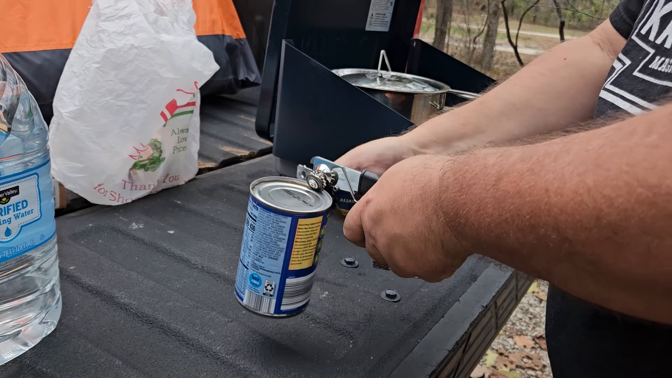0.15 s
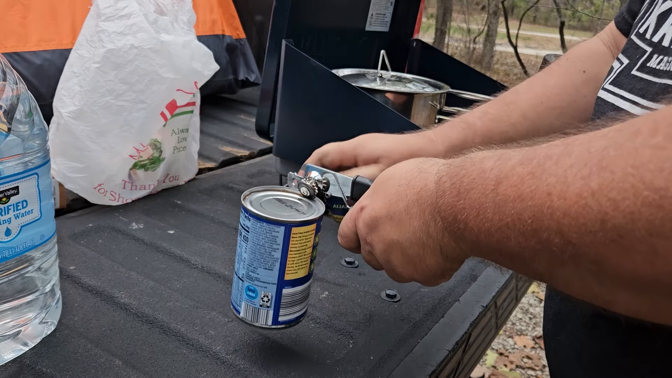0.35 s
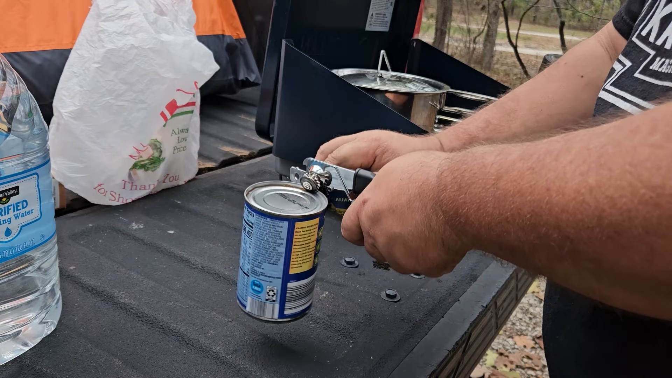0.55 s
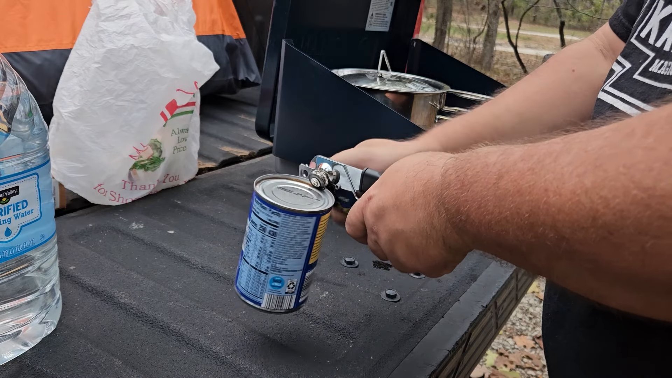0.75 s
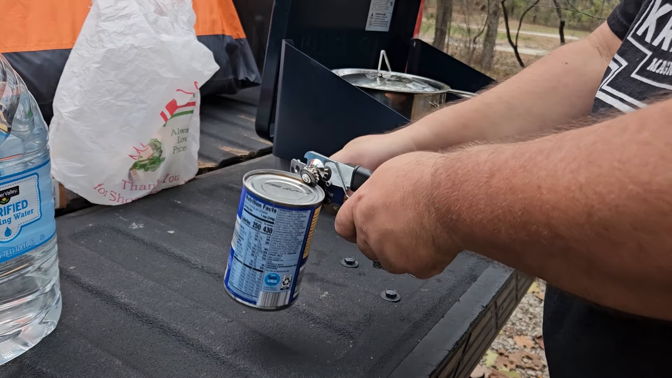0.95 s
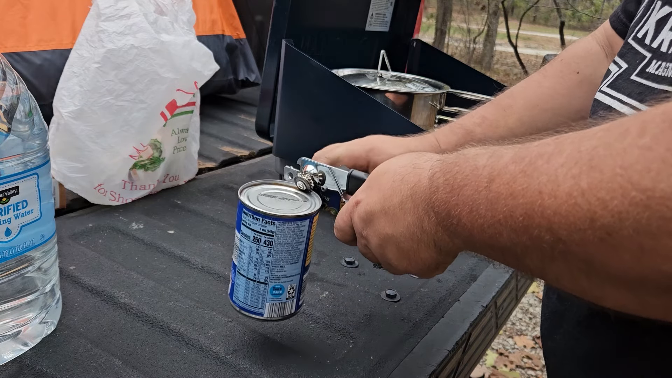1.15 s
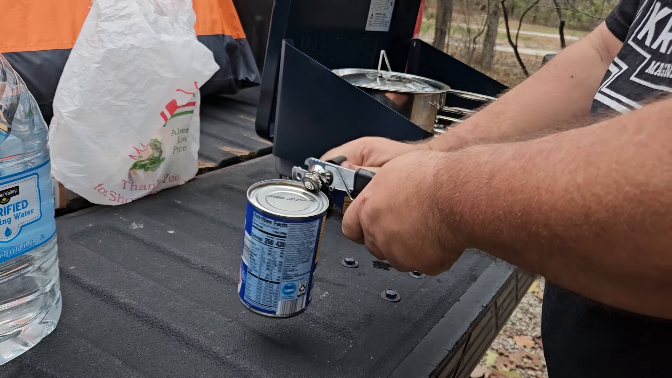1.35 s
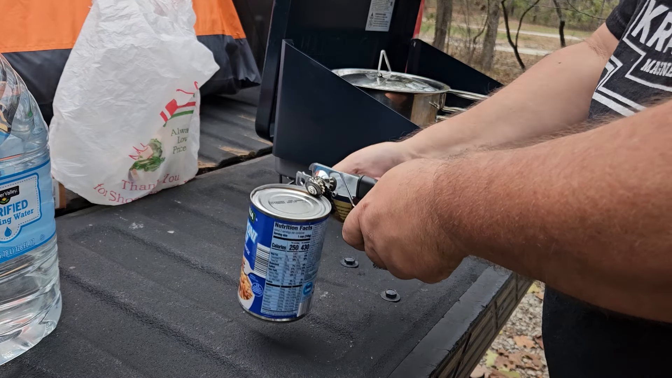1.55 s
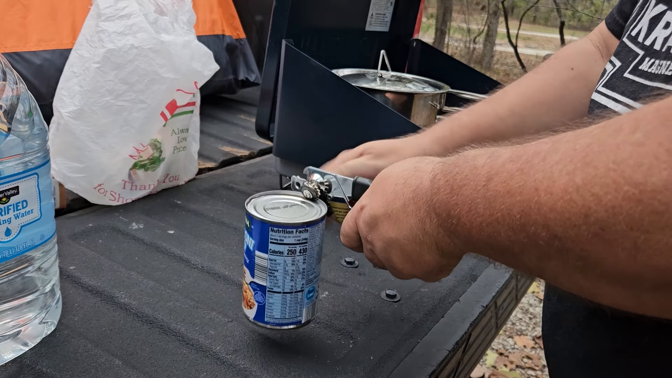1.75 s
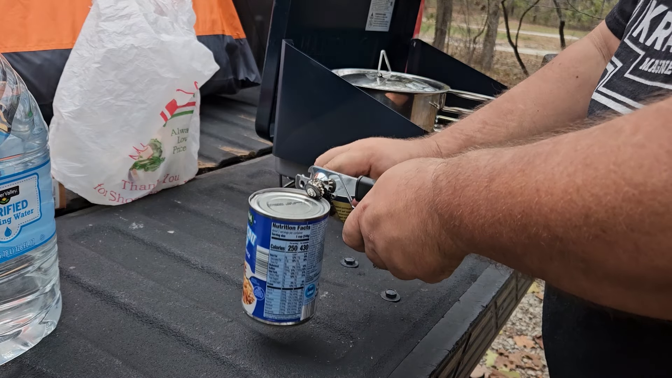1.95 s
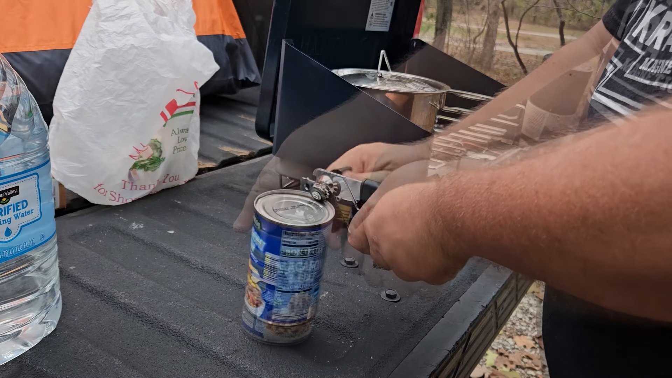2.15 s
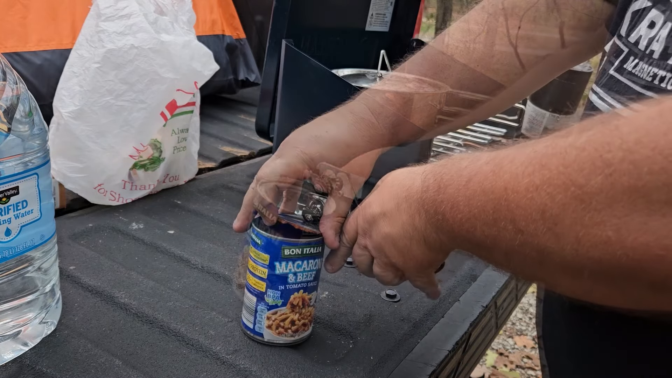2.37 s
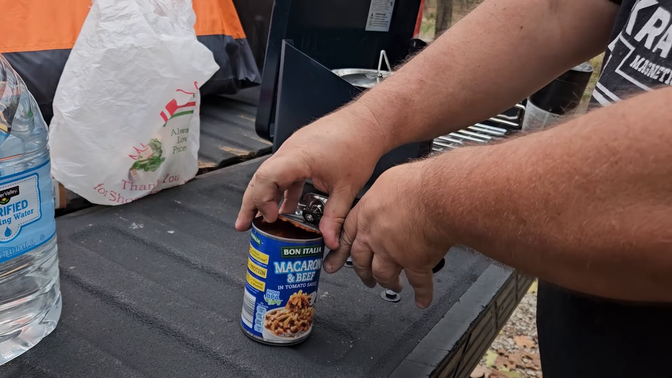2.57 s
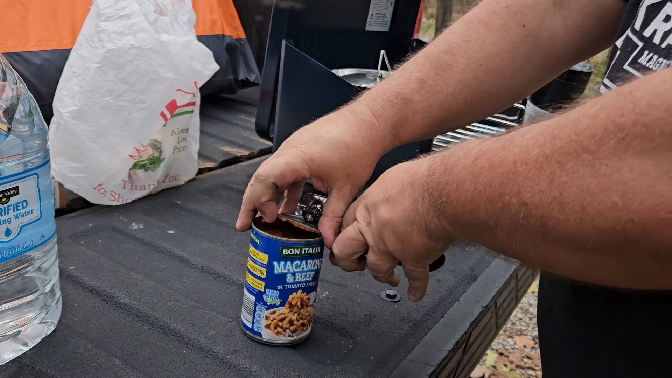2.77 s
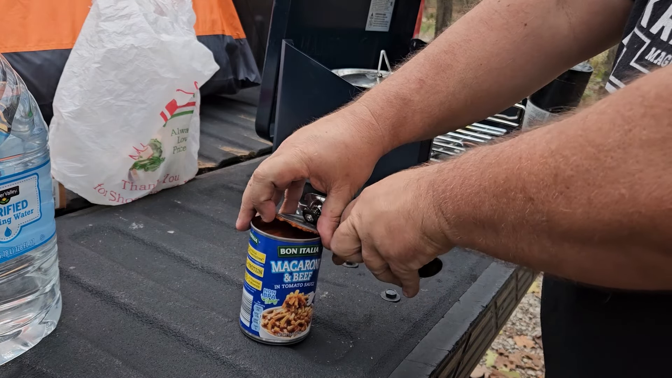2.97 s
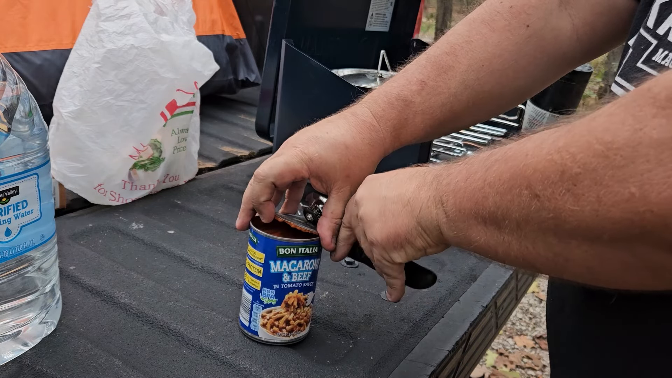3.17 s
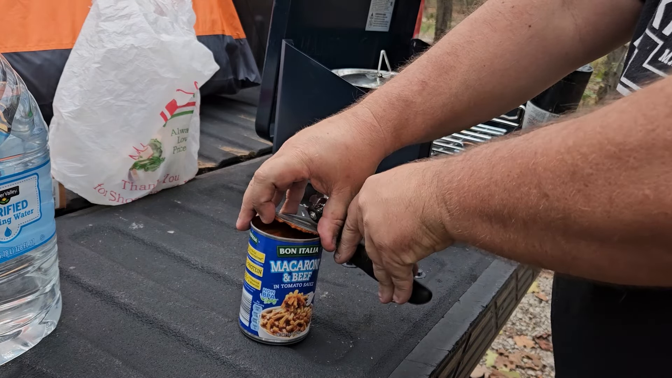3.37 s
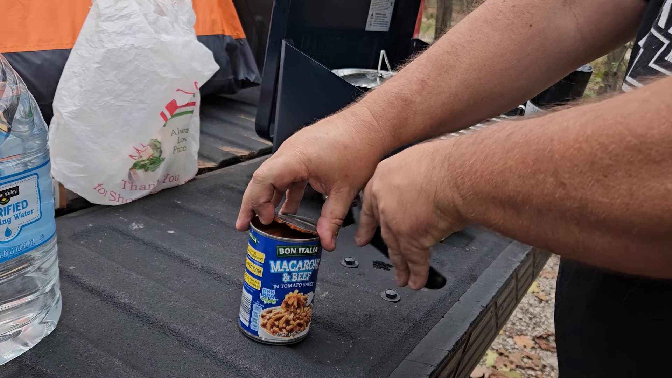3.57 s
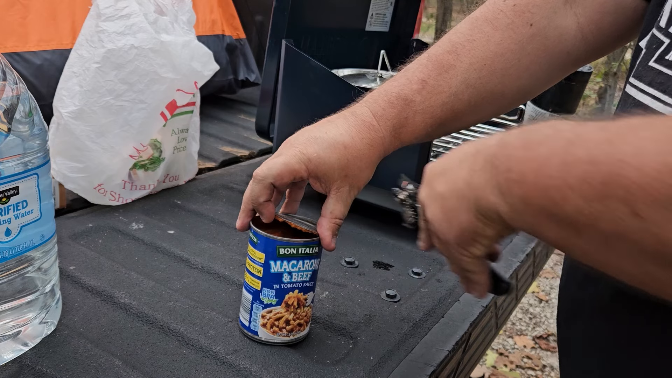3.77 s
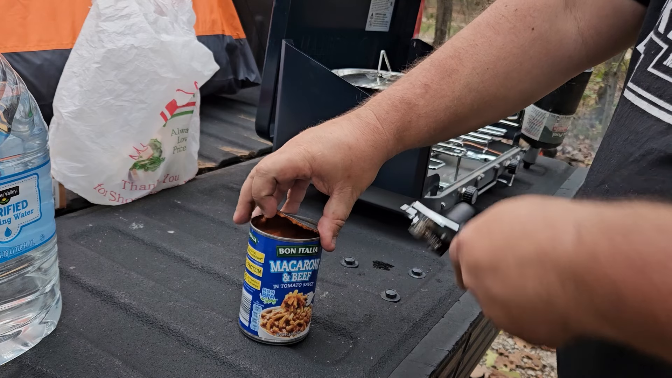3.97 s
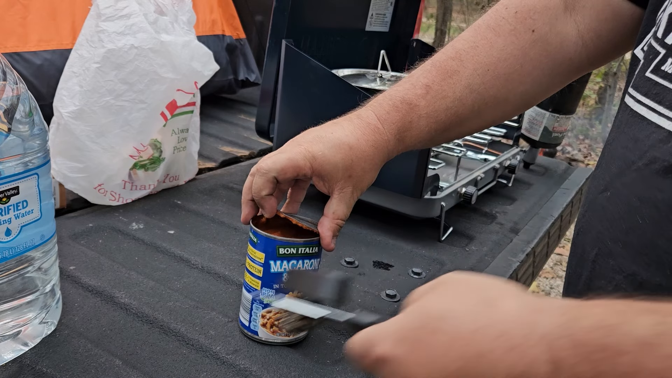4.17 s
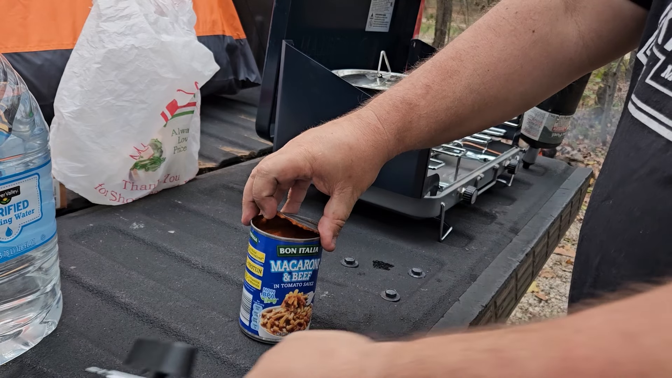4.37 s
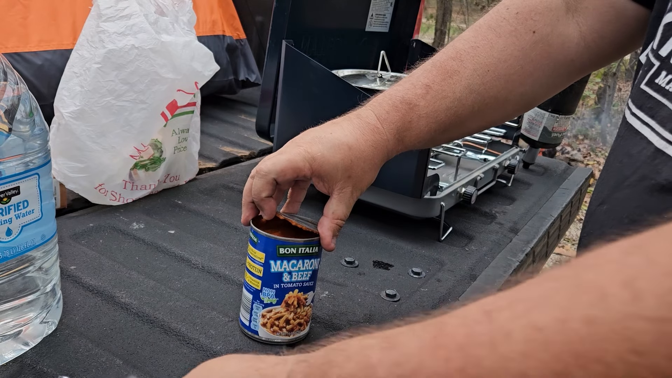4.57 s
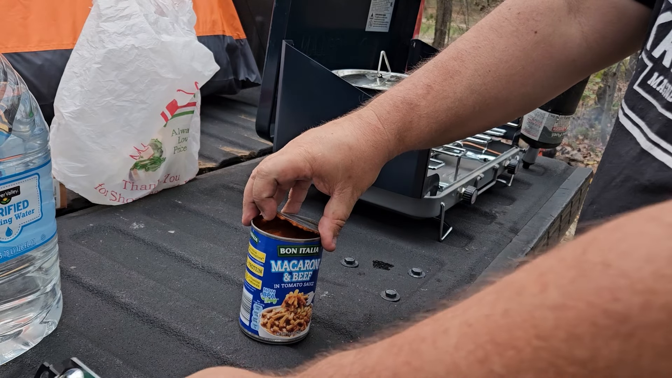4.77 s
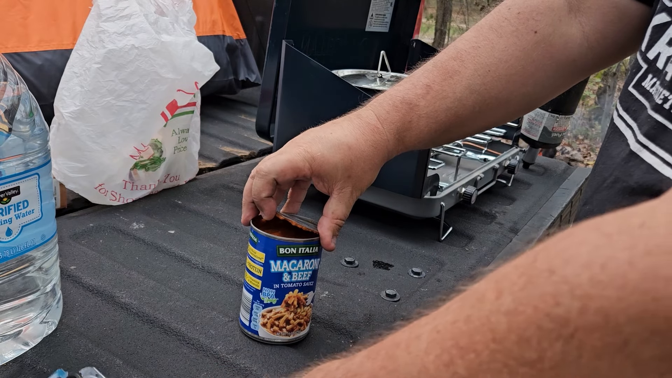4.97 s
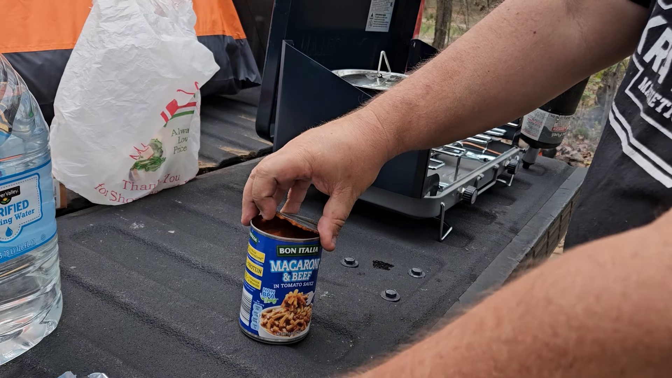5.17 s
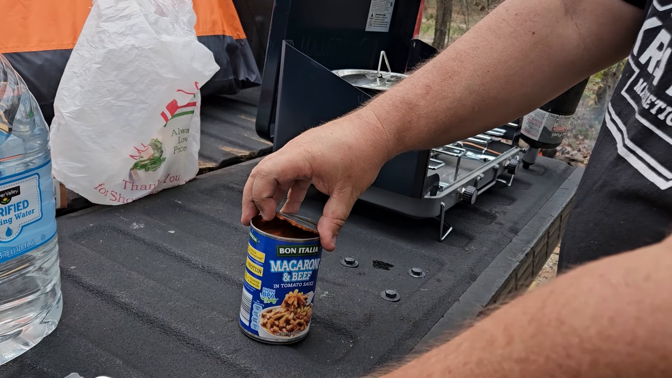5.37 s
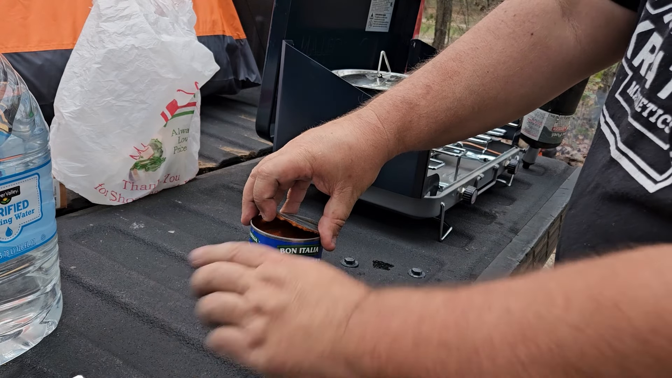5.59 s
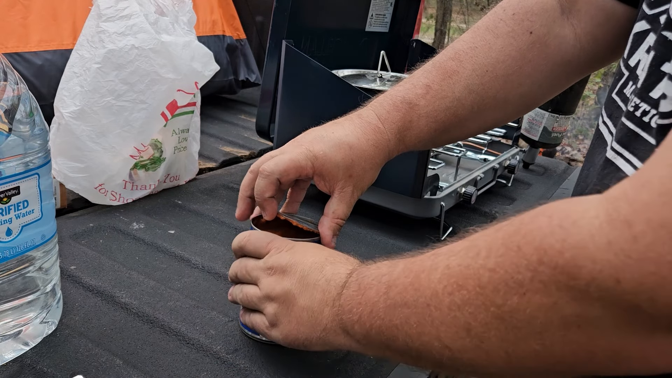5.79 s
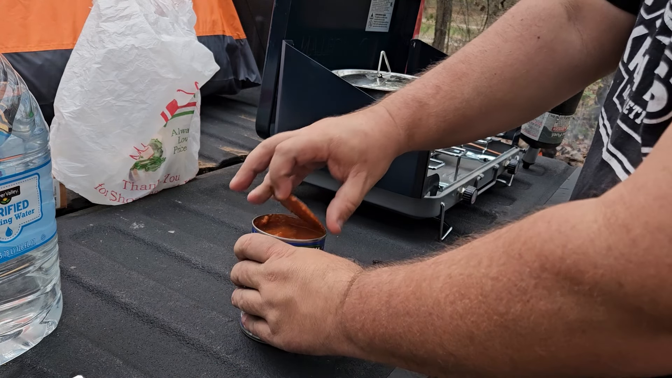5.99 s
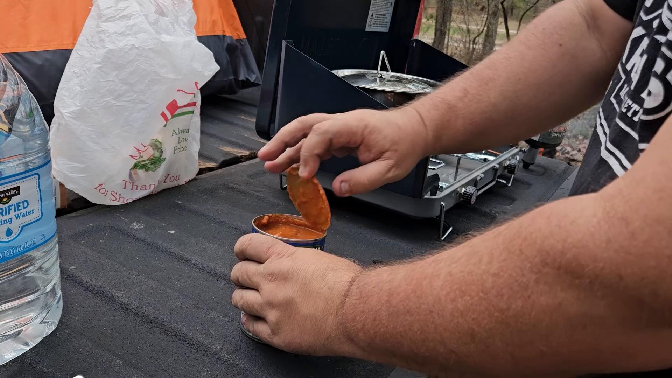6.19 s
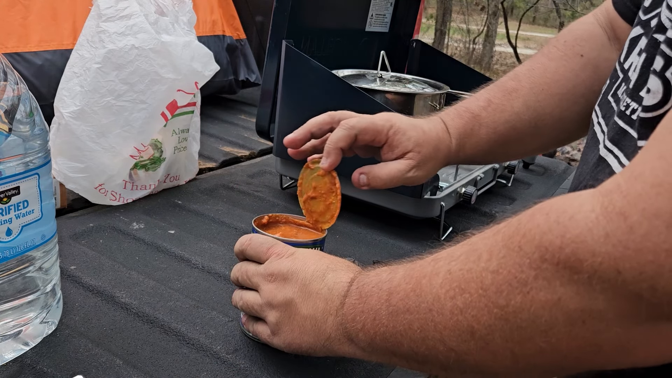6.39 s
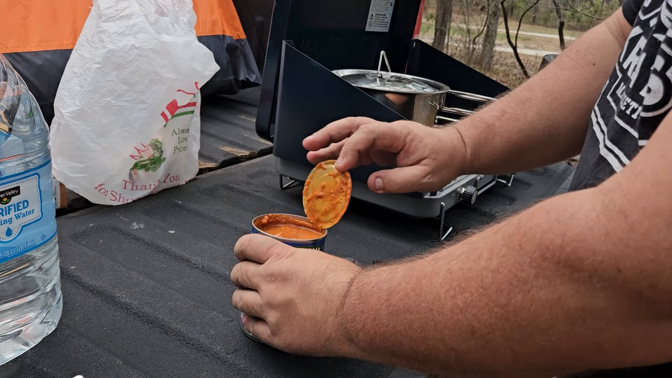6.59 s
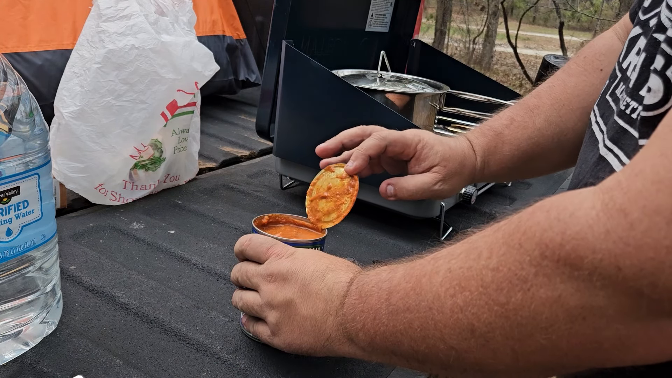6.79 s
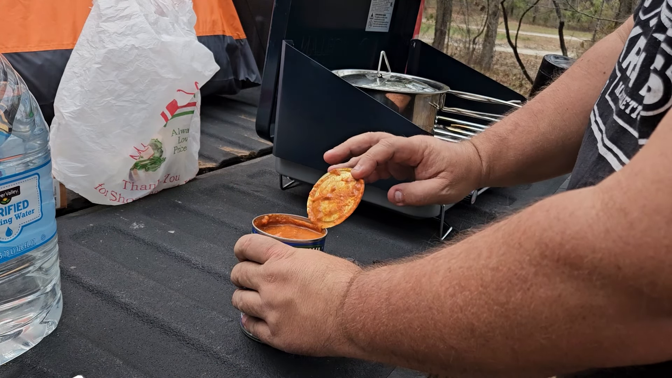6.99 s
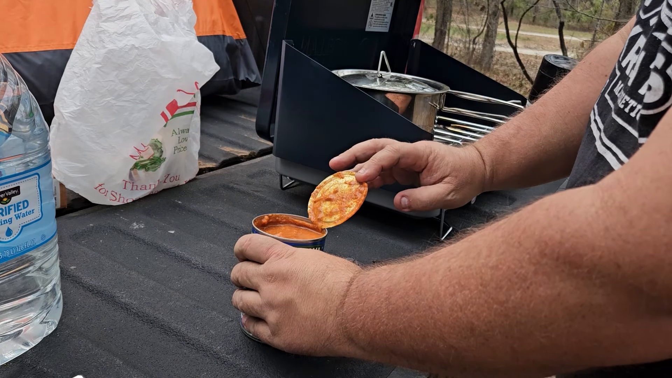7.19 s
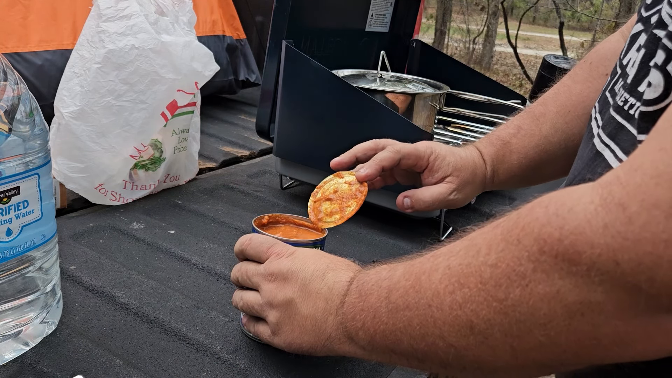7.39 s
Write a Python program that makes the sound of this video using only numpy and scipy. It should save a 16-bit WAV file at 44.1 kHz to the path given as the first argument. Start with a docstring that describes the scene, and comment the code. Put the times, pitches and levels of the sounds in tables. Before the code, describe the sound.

A hand-crank opener grinds around a steel can in four short, buzzing strokes, then clicks free and clatters onto a truck tailgate outdoors, crickets trilling.

```python
"""Steel tears and buzzes in four strokes, then clicks, clatter and thuds follow over crickets and a rumble.
A hand-crank opener cuts round a steel can on a truck's tailgate outdoors: random slips ring the can's modes.
The can is set down, the opener clicks free and clatters onto the tailgate, and the lid is bent up:
damped steel clashes, blows on a panel of decaying modes, swells of grains (one a faint bird chirp).
Trills and narrow noise make the insects; coloured noise makes the open air."""
import sys
import numpy as np
from scipy import signal
from scipy.fft import rfft, irfft
from scipy.io import wavfile

SR = 44100
rng = np.random.default_rng(int(sys.argv[2]) if len(sys.argv) > 2 else 0)


def generate_wav(signal):
    """Clip the signal to [-1, 1] and save it as 16-bit WAV at the path in sys.argv[1]."""
    frames = np.transpose(np.atleast_2d(signal))
    scaled = np.clip(frames, -1, 1) * 32767
    pcm = np.round(scaled).astype(np.int16)
    wavfile.write(sys.argv[1], SR, pcm)


N = 328091
TIME_S = np.arange(N) / SR
FREQ_HZ = np.fft.rfftfreq(N, 1 / SR)

# Turns of the crank. Each row: first bite in seconds, push in seconds, level at full force in dB,
# can ring in dB, loose-lid buzz in dB, later hand slide in dB.
STROKES = [(-.158, .195, -43, 7.5, -3, -64.5), (.56, 0.2, -45, 8, -1, -71.5),
           (1.299, 0.17, -43, 15.5, 4.5, -72), (2.069, .2, -49.5, -3.5, 2, -79.5)]
# Modes of the full can before slackening. Each row: frequency in Hz, width in Hz, gain in dB.
CAN_MODES = [(330, 250, -2.5), (496, 44, 9), (580, 39, -36), (778, 89, 10.5), (872, 52, 8),
             (1446, 59, 13.5), (1650, 41, -11.5), (2000, 37, -18.5), (2930, 160, 1), (3320, 190, -6),
             (3850, 140, -15)]
# Spectrum of tearing steel. Each row: frequency in Hz, gain in dB.
TEAR_SPECTRUM = [(90, -25), (200, -6.5), (400, 5.5), (700, 5.5), (1100, -6.5), (1800, -4.5), (2400, -11),
                 (3700, -5), (4800, -43), (9000, -29.5)]
# Spectrum of the tearing hiss. Each row: frequency in Hz, gain in dB.
HISS_SPECTRUM = [(2000, -44.5), (4200, 13), (6000, 3), (8500, 8), (10500, -6), (12300, 5), (16000, -14.5)]
# Wheel jumps or handle ticks. Each row: start in seconds, level in dB before a common trim,
# pitch in Hz, treble in dB.
SNAPS = [(.005, -38, 3430, 5), (0.142, -57, 3780, -6), (.681, -44.5, 3680, 5), (0.756, -42, 2980, -9),
         (1.383, -43.5, 2780, -0.5), (1.440, -37, 2960, 4), (1.853, -56.5, 2670, -18),
         (2.106, -50.5, 1780, -15), (2.214, -51.5, 3580, -1), (2.280, -51, 2980, -5),
         (4.706, -51.5, 3780, -40)]
# Strikes of the opener's loose parts. Each row: start in seconds, level in dB, pitch of the part in Hz.
CLINKS = [(3.120, -46, 1820), (3.139, -43, 2010), (3.369, -43.5, 7700), (4.3165, -47, 3480),
          (4.3287, -33, 4150), (4.771, -44.5, 8600), (4.938, -56.5, 3550), (5.225, -46.5, 3700),
          (5.227, -47.5, 13000), (5.366, -40.5, 4520), (5.374, -35.5, 11960), (5.389, -36.5, 7600),
          (5.406, -45.5, 4660), (5.414, -43.5, 12000)]
# Spectrum of that steel. Each row: frequency in Hz, gain in dB.
STEEL_SPECTRUM = [(300, -51), (1100, 0), (1500, -6.5), (2100, -4), (2600, -9), (3400, -1), (4150, 1),
                  (5400, -3), (6100, -8), (7900, -3), (10000, -6.5), (12200, -4.5), (14000, -6.5),
                  (16000, -4)]
# Blows on the tailgate. Each row: start in seconds, level in dB, hardness corner in Hz, low cut in Hz,
# mode favoured by the spot struck in Hz.
KNOCKS = [(3.101, -48, 600, 200, 416), (3.120, -46, 2500, 500, 1450), (3.139, -32, 1110, 218, 292),
          (3.144, -37.5, 149, 70, 119), (3.86, -47.5, 166, 79.3, 129), (4.937, -28, 490, 208, 205),
          (5.224, -31, 1520, 330, 1170), (5.356, -25, 260, 70.4, 151), (5.365, -25.5, 1380, 176, 236),
          (5.406, -35.5, 1300, 260, 550), (5.458, -30, 250, 91, 147), (5.469, -31.5, 233, 140, 238)]
# Modes of the tailgate. Each row: frequency in Hz, gain in dB, t60 in seconds.
PANEL_MODES = [(121.9, -3, 0.91), (137.7, 4.5, 0.41), (187.4, 4, 0.18), (239, -7, 0.22), (267, -6.5, 0.19),
               (358.4, -7, 0.22), (426, -2.5, 0.16), (512, -6, 0.23), (579, -31.5, 0.17), (646.3, -3, 0.17),
               (774, -18.5, 0.17), (844, -4.5, 0.11), (1150, 3.5, 0.027), (1224, -16.5, 0.047),
               (1435, -3, 0.084), (2045, -1, 0.084)]
# Spectrum of the blow and dense rattle. Each row: frequency in Hz, gain in dB.
RATTLE_SPECTRUM = [(50, -18), (130, 2), (240, -2.5), (320, -10.5), (600, -6), (900, -17.5), (1200, -8.5),
                   (2000, -11.5), (8000, -30)]
# Decay of the rattle. Each row: frequency in Hz, t60 in seconds.
RATTLE_T60 = [(100, 0.84), (500, 0.53), (1000, 0.19), (3000, 0.17), (10000, 0.088)]
# Can nudged and rocking back. Each row: start in seconds, level in dB, hardness corner in Hz,
# low cut in Hz, mode favoured in Hz, level of the return in dB.
ROCKS = [(2.521, -46.5, 180, 252, 355, -45), (3.251, -48, 885, 170, 276, -41),
         (5.750, -36.5, 216, 89.5, 148.4, -41)]
# Rubs of fingers, opener and lid, and at 7.3 s a faint distant bird chirp. Each row: middle in seconds,
# length in seconds, level in dB, centre in Hz, width in octaves.
RUBS_AND_CHIRP = [(2.37, .15, -61.5, 310, 0.54), (2.928, 0.036, -60, 1800, 1.3),
                  (3.108, 0.098, -59, 8000, 6.1), (3.324, 0.15, -67.5, 8600, 4.5),
                  (3.779, 0.4, -75.5, 8500, 1.2), (5.102, 0.093, -53, 207, 1),
                  (5.728, 0.092, -56.5, 12000, 1.46), (5.982, 0.072, -69.5, 1840, 0.5),
                  (6.415, 0.063, -60.5, 1100, 0.59), (6.639, .03, -72, 2180, 0.37),
                  (7.3, .3, -77, 1335, 0.06)]
# Crank bands rung by the sliding hand. Each row: centre in Hz, width in octaves, gain in dB.
REGRIP_BANDS = [(2630, .2, -8.5), (3810, 0.14, -5.5), (8400, 0.49, -4)]
# Near crickets. Each row: nominal pitch in Hz, level in dB, list of trill starts in seconds.
TRILLS = [(4715, -72, [1.45, 3.801, 5.22, 6.84]), (4570, -79.5, [2.421, 3.37, 4.35, 5.049, 6.501, 7.2]),
          (4050, -83, [3.4, 4.78])]
# Far insects. Each row: frequency in Hz, width in Hz, level in dB.
CHORUS = [(4550, 200, -80), (5540, 250, -86.5), (7540, 620, -94.5)]
# Spectrum of open air. Each row: frequency in Hz, relative density in dB per Hz.
AIR_SPECTRUM = [(20, -6), (38, -9), (80, -2), (130, -5), (170, -19), (300, -23), (550, -26), (1000, -32),
                (2200, -36), (4000, -39), (5600, -42), (6500, -50), (9500, -60), (16000, -62)]
# Left-right likeness of the air. Each row: frequency in Hz, likeness from 0 to 1.
AIR_LIKENESS = [(30, 0.81), (100, 1), (250, 0.52), (600, 0.23), (1500, 0), (8000, 0)]

# every turn starts light, swells to full force, holds and lets go
BITE_DB, SWELL_S, RELEASE_DB_PER_S, RELEASE_S = -13.5, .128, 440, .09
TEETH_PER_S = 37.8
# hiss against body at full force; it loses this many dB more per dB of slack
HISS_DB, HISS_SLOPE_DB_PER_DB = -14, 0.093
# the can's modes sink as the lid is cut free: pitch factor at time 0, loss per s
STIFFNESS, SLACKENING_PER_S = 1.0084, 0.026
# chance jumps through a turn: rate, mean level against the force, middle pitch, treble
JUMPS_PER_S, JUMP_DB, JUMP_HZ, JUMP_TREBLE_DB = 15, -7, 2570, -3
# below the firm level a clink's high cut drops an octave per so many dB
CLINK_T60_S, FIRM_DB, FIRM_HZ, DB_PER_OCTAVE = 0.032, -44.5, 13150, 8.5
# a part radiates little below this share of its pitch, up to a limit
RADIATES_SHARE, RADIATES_LIMIT_HZ = 0.5, 2380
# the opener's last bounces: start, gap, first level, loss per bounce, pitch
SETTLE_S, SETTLE_GAP_S, SETTLE_DB, SETTLE_LOSS_DB, SETTLE_HZ = 5.445, 0.015, -53, 1.7, 4010
# the rocking can's return: delay, favoured mode, low cut, hardness limit
ROCK_DELAY_S, BASE_HZ, BASE_CUT_HZ, BASE_CORNER_HZ = .063, 118, 67, 430
# from the end of the push to the middle of the hand's slide; length of the slide
REGRIP_DELAY_S, REGRIP_S = 0.19, 0.33
GLIDE_START_S, GLIDE_S, GLIDE_FROM_HZ, GLIDE_TO_HZ, GLIDE_DB = 2.32, .215, 330, 238, -61
TRILL_S, WING_HZ = 0.393, 46
AIR_DB = -59.5
ECHO_BLEND_HZ = 3.1
BAND_EDGE_HZ = 15950


def cutting():
    """Each gear tooth bites and eases off; under it the wheel tears the lid in tiny slips that ring the can."""
    out = np.zeros(N + SR)
    for start_s, push_s, level_db, ring_db, buzz_db, _ in STROKES:
        age_s = np.arange(max(-start_s, 0), push_s + RELEASE_S, 1 / SR)
        slack_db = -force_db(age_s, push_s)
        stiffness = STIFFNESS - SLACKENING_PER_S * start_s
        # at light pressure the teeth bite one by one; at full force they run together
        tooth_depth_db = np.minimum(4.5 + 1.2 * slack_db, 16)
        tooth = amp(-tooth_depth_db * (age_s * TEETH_PER_S % 1 - .5))
        drive = slips(len(age_s), per_s=2100, spread_db=2.5) * tooth

        ring = sum(amp(db) * resonate(drive, hz * stiffness, width_hz) for hz, width_hz, db in CAN_MODES)
        buzz = resonate(resonate(drive, 467, 147), 693, 183)
        tear = colour(np.roll(drive, 20), TEAR_SPECTRUM)
        body = unit_rms(amp(ring_db) * unit_rms(ring) + amp(2.5) * unit_rms(tear)
                        + amp(buzz_db) * unit_rms(buzz))

        grit = drive + 2.0 * rng.standard_normal(len(age_s))
        hiss = unit_rms(colour(grit, HISS_SPECTRUM)) * amp(HISS_DB - HISS_SLOPE_DB_PER_DB * slack_db)
        level = amp(level_db - slack_db) * signal.windows.tukey(len(age_s), .02)
        add(out, start_s, (body + hiss) * level)
    return out[:N]


def force_db(age_s, push_s):
    """The hand's force on the crank in dB below full: a swell, a hold and a release."""
    swell_db = BITE_DB * np.clip(1 - age_s / SWELL_S, 0, 1)
    return swell_db - RELEASE_DB_PER_S * np.maximum(age_s - push_s, 0)


def snaps():
    """Single large slips: a dry crack and a short ring at one pitch."""
    out = np.zeros(N)
    for start_s, db, hz, treble_db in [*SNAPS, *small_jumps()]:
        crack = band(burst(0.0059), 410, 12300)
        ring = resonate(resonate(burst(0.016), hz, 520), hz, 1300)
        snap = unit_attack(ring) + amp(treble_db) * unit_attack(crack)
        add(out, start_s, amp(db - 5.5) * unit_attack(snap))
    return out


def small_jumps():
    """Chance jumps of the wheel, following the force of the moment."""
    for start_s, push_s, level_db, *_ in STROKES:
        for when, size, pitch in rng.random((round(JUMPS_PER_S * push_s), 3)):
            age_s = when * push_s
            if start_s + age_s > 0:
                db = level_db + force_db(age_s, push_s) + JUMP_DB + 6 * (size - .5)
                yield start_s + age_s, db, JUMP_HZ * 2 ** (pitch - .5), JUMP_TREBLE_DB


def clinks():
    """Steel on steel, damped at once by the hand or the handles; the part struck sings on very briefly."""
    out = np.zeros(N)
    for start_s, db, hz in [*CLINKS, *settling(count=5)]:
        high_hz = FIRM_HZ * 2 ** (min(db - FIRM_DB, 0) / DB_PER_OCTAVE)
        low_hz = min(RADIATES_SHARE * hz, RADIATES_LIMIT_HZ)
        noise = burst(CLINK_T60_S) + amp(13.5) * burst(0.0072) + amp(-22.0) * burst(0.18)
        clash = colour(noise, STEEL_SPECTRUM)
        clash = band(band(clash, low_hz, high_hz), 0.42 * low_hz, 20000)
        t = TIME_S[:len(clash)]
        note = np.sin(2 * np.pi * hz * t) * amp(-60 * t / CLINK_T60_S)
        contact = 1 - np.exp(-t / .0006)
        clink = (unit_attack(clash) + amp(-8.0) * unit_attack(note)) * contact
        add(out, start_s, amp(db) * unit_attack(clink))
    return out


def settling(count):
    """The opener chatters to rest in even, fading bounces."""
    return [(SETTLE_S + k * SETTLE_GAP_S, SETTLE_DB - k * SETTLE_LOSS_DB, SETTLE_HZ) for k in range(count)]


def knocks():
    """Each blow thuds, rings the panel's modes according to where it lands, and shakes its loose parts."""
    out, t = np.zeros(N), TIME_S[:SR]
    for start_s, db, high_hz, low_hz, spot_hz in [*KNOCKS, *rocking()]:
        modes = 0
        for k, (hz, mode_db, t60_s) in enumerate(PANEL_MODES):
            favour_db = 8 * np.exp(-(np.log2(hz / spot_hz) / .17) ** 2)
            decay = amp(mode_db + favour_db - 60 * t / t60_s)
            modes = modes + (-1) ** (k // 2) * decay * np.sin(2 * np.pi * hz * t)

        # noise whose decay time depends on frequency
        f_hz, age_s, z = signal.stft(rng.standard_normal(SR), SR, nperseg=256)
        fading = z * amp(-60 * age_s / read(RATTLE_T60, f_hz[:, None]))
        tail = signal.istft(fading, SR, nperseg=256)[1][:SR]

        click = unit_attack(signal.unit_impulse(SR))
        thud = unit_attack(burst(0.028, size=SR))
        contact = click + amp(6.0) * thud + amp(-8) * unit_attack(tail)
        blow = unit_attack(colour(contact, RATTLE_SPECTRUM)) + amp(-1.5) * unit_attack(modes)
        blow = band(blow, low_hz, high_hz)
        # the level is the blow's whole energy, as if spread over a fiftieth of a second
        add(out, start_s, amp(db) * blow * np.sqrt(SR / 50) / np.linalg.norm(blow))
    return out


def rocking():
    """Each nudge of the can makes two blows: its rim, then its base, with a low, soft contact."""
    for start_s, db, high_hz, low_hz, spot_hz, return_db in ROCKS:
        yield start_s, db, high_hz, low_hz, spot_hz
        yield start_s + ROCK_DELAY_S, return_db, min(high_hz, BASE_CORNER_HZ), BASE_CUT_HZ, BASE_HZ


def rubs_and_chirp():
    """Short swells of fine friction grains; a very narrow band of the same grains makes the bird chirp."""
    out = np.zeros(N)
    for middle_s, length_s, db, hz, octaves in [*RUBS_AND_CHIRP, *regrips()]:
        count = int(length_s * SR)
        distance_octaves = np.log2((np.fft.rfftfreq(count, 1 / SR) + 1) / hz)
        shape = np.exp(-.5 * (distance_octaves / octaves) ** 2)
        grains = irfft(rfft(slips(count, per_s=9400, spread_db=1.5)) * shape, count)
        add(out, middle_s - length_s / 2, amp(db) * unit_rms(grains) * np.hanning(count))
    return out


def regrips():
    """After each turn the hand slides back for a new grip and rings the crank."""
    return [(start_s + push_s + REGRIP_DELAY_S, REGRIP_S, slide_db + db, hz, octaves)
            for start_s, push_s, *_, slide_db in STROKES for hz, octaves, db in REGRIP_BANDS]


def glide():
    """A faint low tone after the last turn that sinks and levels off."""
    u = np.linspace(0, 1, round(GLIDE_S * SR))
    hz = GLIDE_TO_HZ + (GLIDE_FROM_HZ - GLIDE_TO_HZ) * np.cos(np.pi / 2 * u) ** 4
    tone = unit_rms(np.sin(2 * np.pi * np.cumsum(hz) / SR))
    out = np.zeros(N)
    add(out, GLIDE_START_S, amp(GLIDE_DB) * tone * signal.windows.tukey(len(u), .5))
    return out


def crickets():
    """Trills of fast wing strokes, arching in pitch and blurred by narrow noise, over a steady far chorus."""
    near, t = np.zeros(N), np.arange(0, TRILL_S, 1 / SR)
    arch = 1 + 0.01483 * (np.sin(np.pi * t / t[-1]) - .7)
    wings = 1 + .45 * np.sin(2 * np.pi * WING_HZ * t)
    fade = signal.windows.tukey(len(t), .4)
    for hz, db, starts_s in TRILLS:
        for start_s in starts_s:
            tone = np.sin(2 * np.pi * np.cumsum(hz * arch) / SR) + 0.64 * whistle(hz, 120, len(t))
            add(near, start_s, amp(db) * unit_rms(tone * wings) * fade)
    # independent in each ear
    far = [sum(amp(db) * whistle(hz, width_hz, N) for hz, width_hz, db in CHORUS) for ear in "LR"]
    return two_mics(near, pan_db=8, lead_samples=0, echo_db=-9) + far


def whistle(hz, width_hz, count):
    """A narrow, unsteady tone: noise through two equal resonances."""
    return unit_rms(resonate(resonate(rng.standard_normal(count), hz, width_hz), hz, width_hz))


def air():
    """Distant rumble and hiss: coloured noise, most alike in both ears in the bass."""
    left, other = rfft(rng.standard_normal((2, N)))
    same = np.clip(read(AIR_LIKENESS, FREQ_HZ), -1, 1)
    both = np.array([left, same * left + np.sqrt(1 - same ** 2) * other])
    # the division keeps the sum of the two ears on the given spectrum
    gain = amp(read(AIR_SPECTRUM, FREQ_HZ)) / np.sqrt(1 + same)
    return amp(AIR_DB) * unit_rms(irfft(both * gain, N))


def two_mics(x, pan_db, lead_samples, echo_db):
    """Pan and lead to the left; two short random echoes, blended in slow rotation, make the sides unlike."""
    treble, side = band(x, 260, 29000), 0
    for phase in 0, np.pi / 2:
        echo = burst(0.02, size=1024)
        blended = treble * np.sin(2 * np.pi * ECHO_BLEND_HZ * TIME_S + phase)
        side = side + amp(echo_db) * signal.oaconvolve(blended, echo / np.linalg.norm(echo))[:N]
    # half of the pan and lead to each side; the pan grows towards the treble
    lean = amp(pan_db / 2 * FREQ_HZ / (FREQ_HZ + 150)) * np.exp(1j * np.pi * FREQ_HZ * lead_samples / SR)
    return np.array([irfft(rfft(x + side) * lean, N), irfft(rfft(x - side) / lean, N)])


def slips(count, per_s, spread_db):
    """Stick-slip: random tiny jerks, a few much larger than the rest."""
    chance, size, sign = rng.random((3, count))
    height = amp(-spread_db * np.log(size + 0.018))
    return unit_rms((chance < per_s / SR) * height * np.sign(sign - .5))


def burst(t60_s, size=8192):
    """A dense ring of many modes: noise that falls 60 dB in t60_s."""
    return rng.standard_normal(size) * amp(-60 * np.arange(size) / SR / t60_s)


def resonate(x, hz, width_hz):
    """One resonance of gain 1."""
    return signal.lfilter(*signal.iirpeak(hz, hz / width_hz, SR), x)


def band(x, low_hz, high_hz):
    """Gentle low cut and high cut."""
    for hz, kind in (low_hz, "high"), (high_hz, "low"):
        x = signal.sosfilt(signal.butter(2, min(hz, SR / 2 - 10), kind, fs=SR, output="sos"), x)
    return x


def colour(x, points):
    """Causal filter with the given spectrum: nothing sounds before the attack."""
    log_gain = np.log(amp(read(points, abs(np.fft.fftfreq(4096, 1 / SR)))))
    # minimum phase from the log gain
    taps = np.fft.ifft(np.exp(signal.hilbert(log_gain).conj())).real
    return signal.oaconvolve(x, taps[:len(taps) // 2])[:len(x)]


def read(points, hz):
    """Reads a table on a logarithmic frequency axis."""
    f_hz, value = np.transpose(points)
    return np.interp(np.log(hz + 1), np.log(f_hz + 1), value)


def amp(db):
    """Decibels to gain."""
    return 10 ** (np.asarray(db) / 20)


def unit_rms(x):
    """Scales to rms 1."""
    return x / np.sqrt(np.mean(x ** 2) + 1e-20)


def unit_attack(x):
    """Scales a hit so that its first hundredth of a second has rms 1."""
    return x / np.sqrt(np.mean(x[:SR // 100] ** 2) + 1e-20)


def add(mix, start_s, sound):
    """Lays a sound into the mix, from time 0 at the earliest."""
    part = mix[max(round(start_s * SR), 0):][:len(sound)]
    part += sound[:len(part)]


def scene():
    """The can stands near the middle; the opener swings to the left as it is put away."""
    hand = cutting() + snaps() + rubs_and_chirp() + glide()
    can = two_mics(hand, pan_db=3.5, lead_samples=2.23, echo_db=-5)
    steel = clinks()
    away = np.clip(TIME_S - 3.4, 0, .5) * 2
    opener_near = two_mics(steel * (1 - away), pan_db=1.5, lead_samples=1.0, echo_db=-7.0)
    opener_away = two_mics(steel * away, pan_db=7.5, lead_samples=6.5, echo_db=-3.5)
    tailgate = two_mics(knocks(), pan_db=1.5, lead_samples=9.3, echo_db=-7.5)
    return can + opener_near + opener_away + tailgate + crickets() + air()


def record(dry):
    """The recorder's band limit: a steep high cut."""
    taps = signal.firwin(511, BAND_EDGE_HZ, window=("kaiser", 9), fs=SR)
    return signal.oaconvolve(dry, taps[None], "same")


dry = scene()
out = record(dry)
generate_wav(out)
```